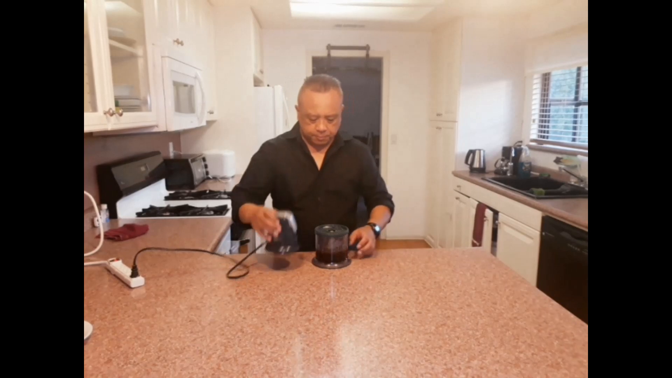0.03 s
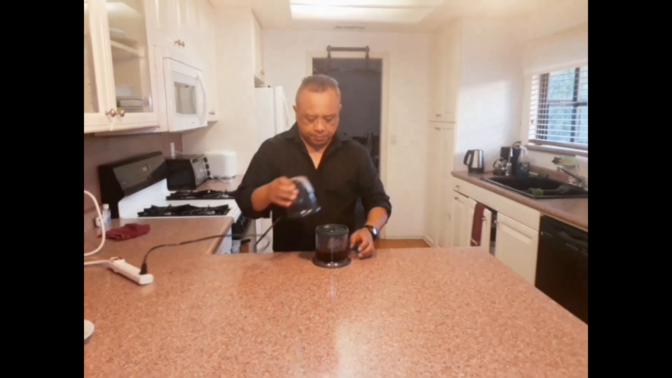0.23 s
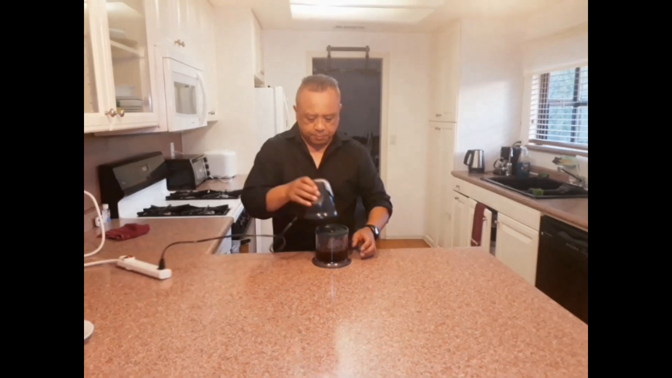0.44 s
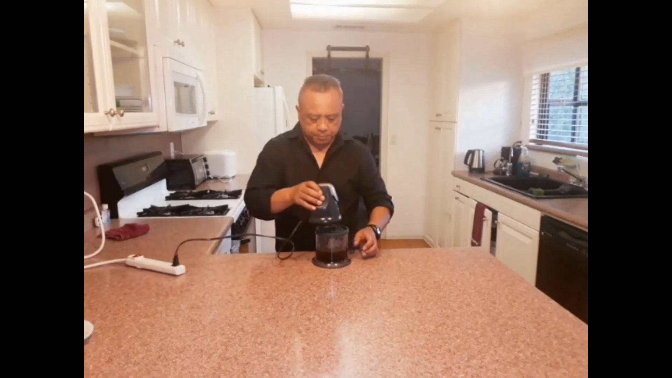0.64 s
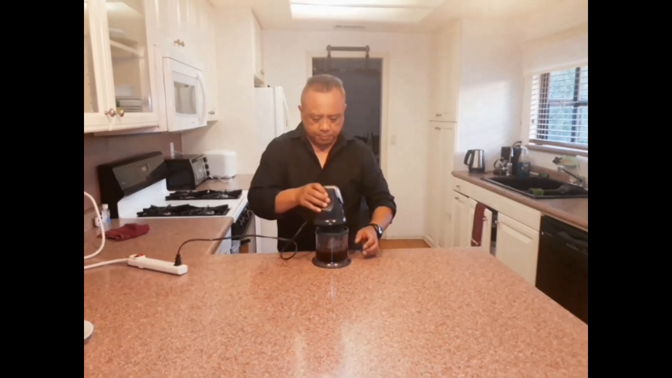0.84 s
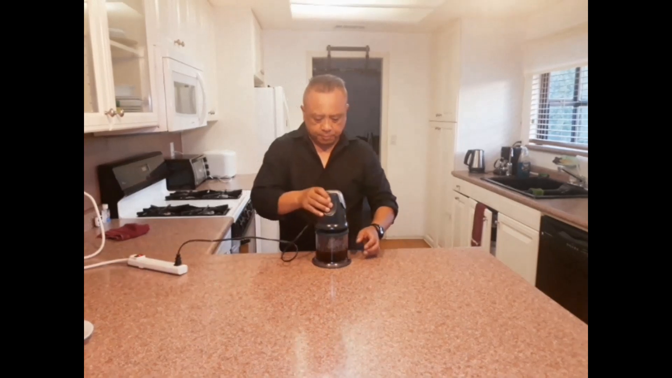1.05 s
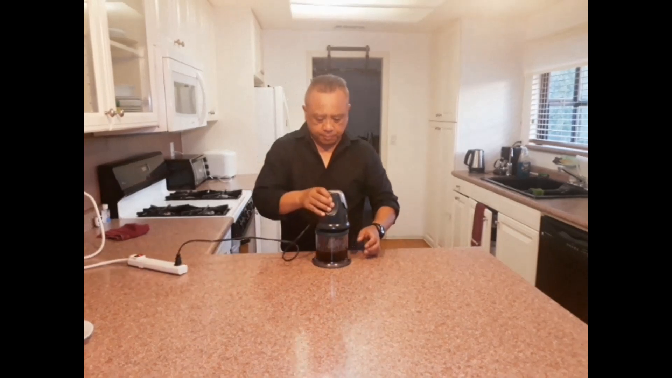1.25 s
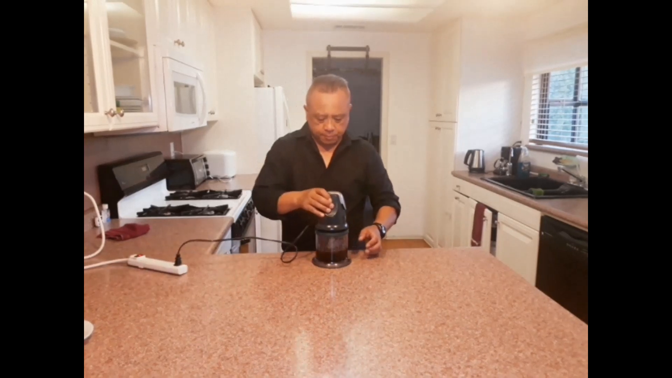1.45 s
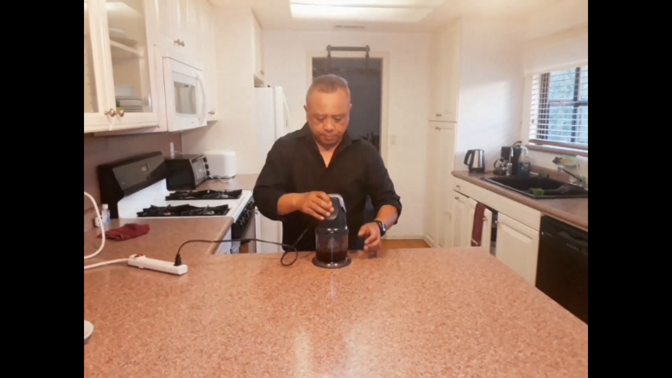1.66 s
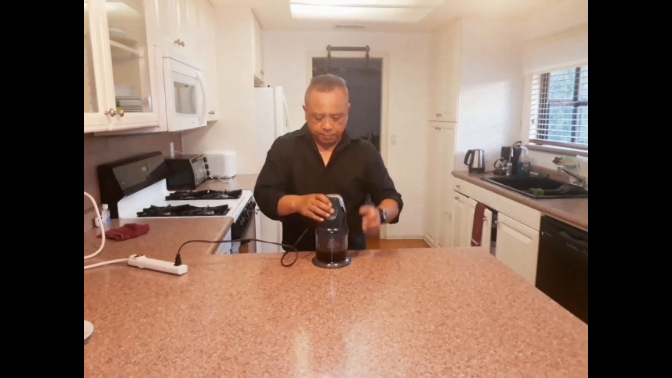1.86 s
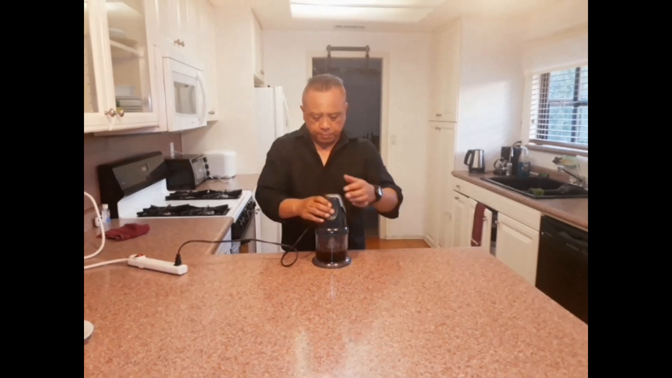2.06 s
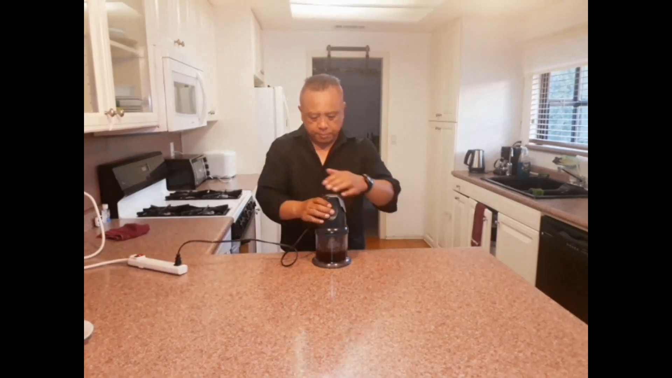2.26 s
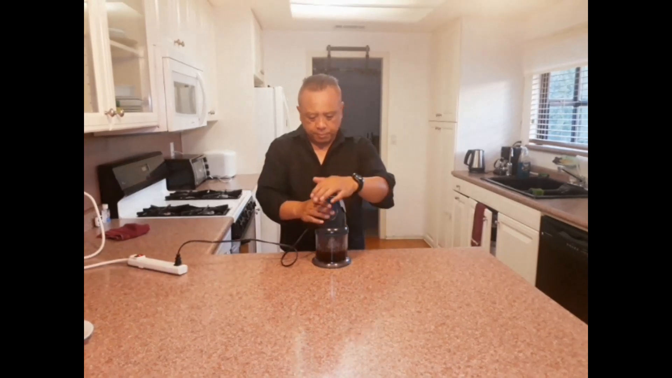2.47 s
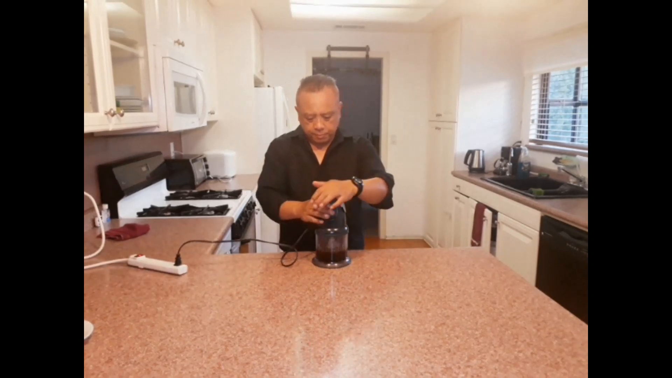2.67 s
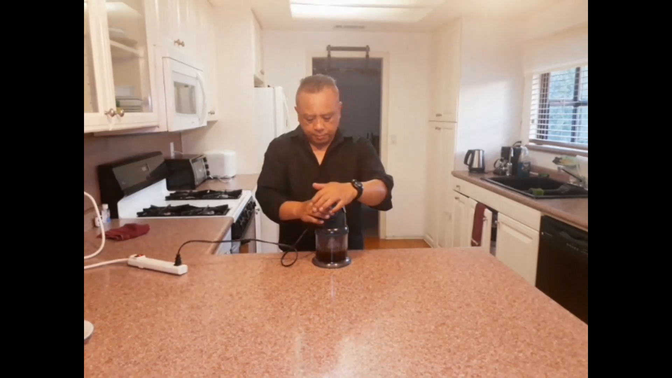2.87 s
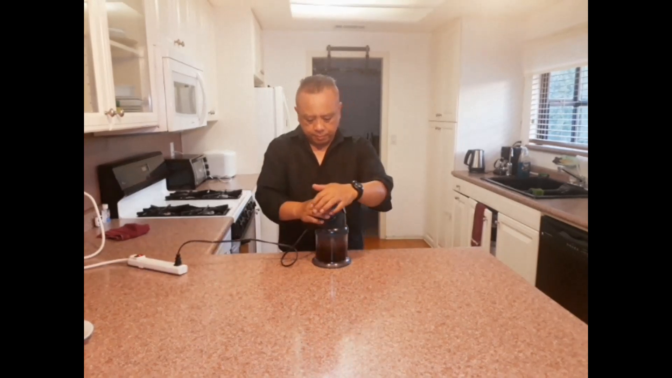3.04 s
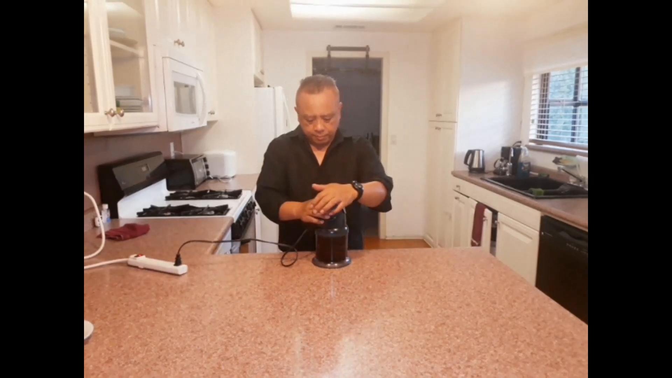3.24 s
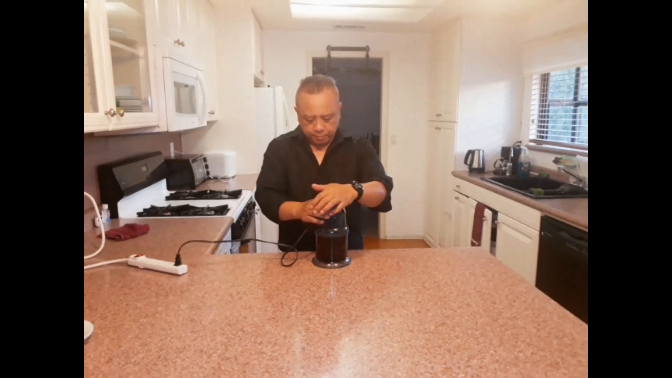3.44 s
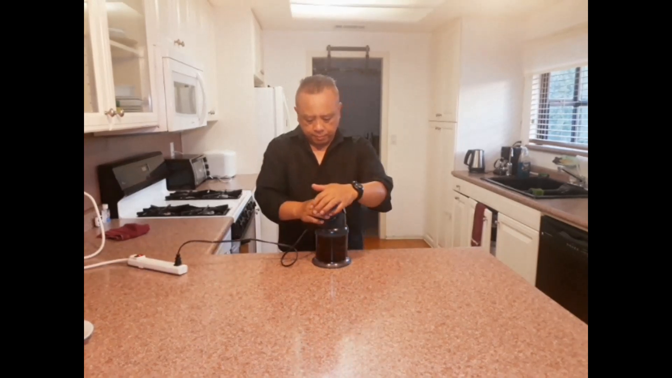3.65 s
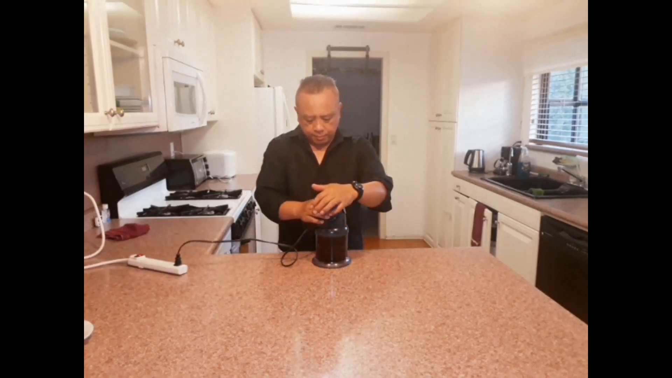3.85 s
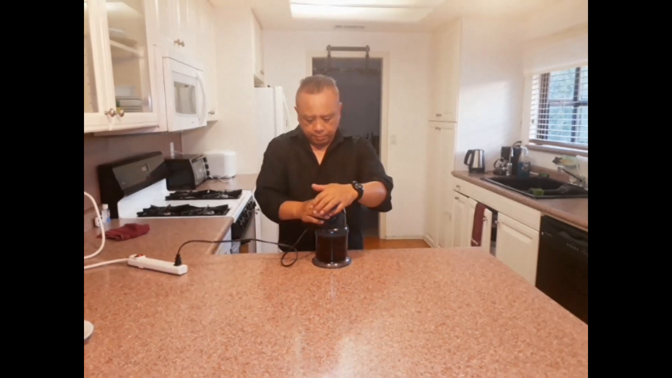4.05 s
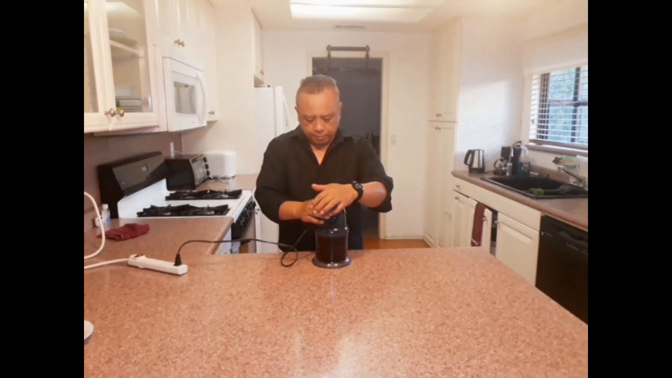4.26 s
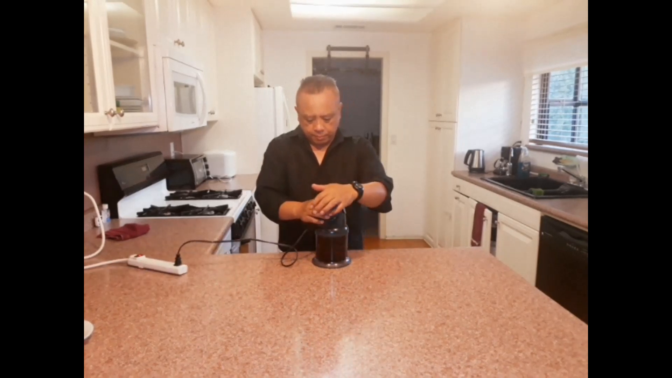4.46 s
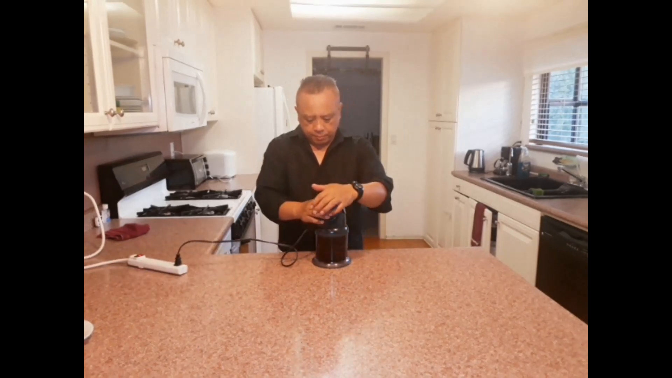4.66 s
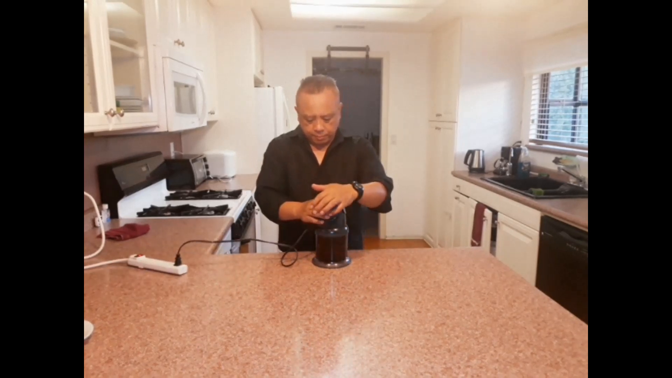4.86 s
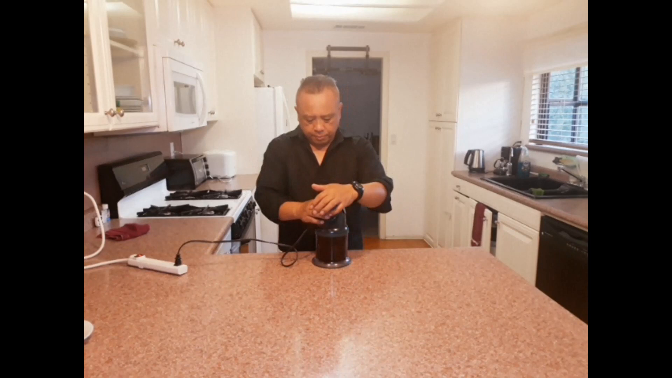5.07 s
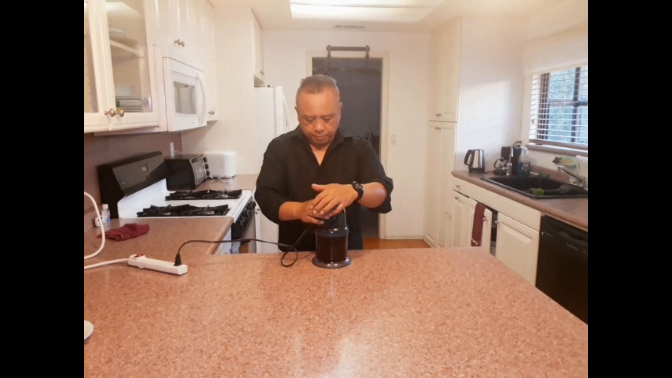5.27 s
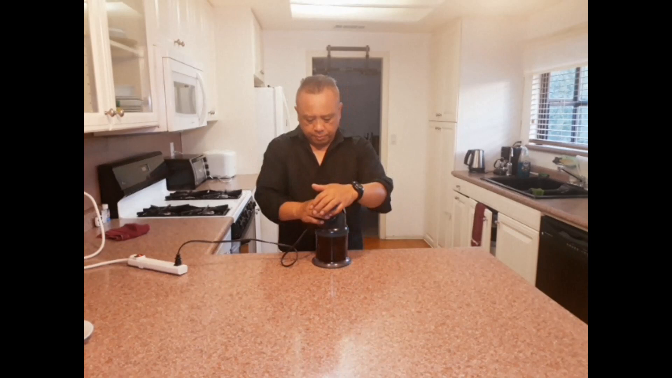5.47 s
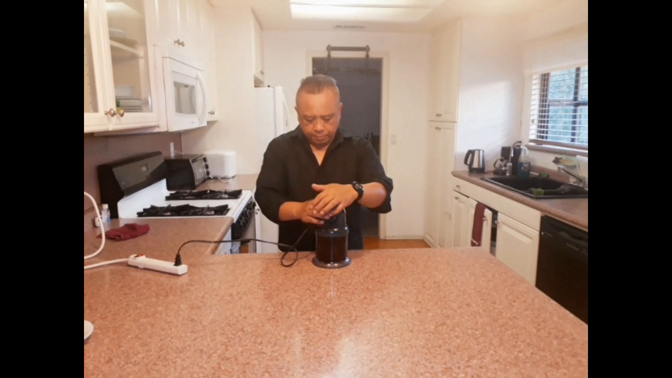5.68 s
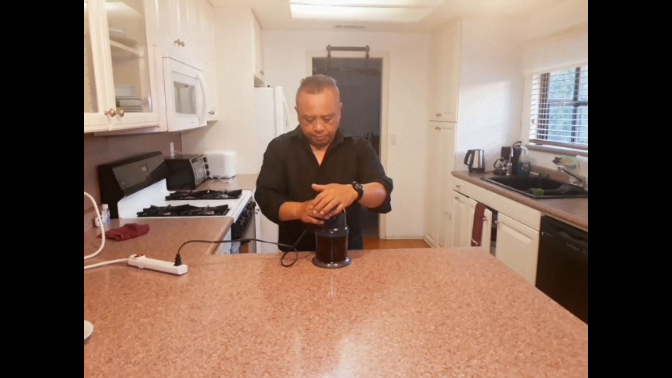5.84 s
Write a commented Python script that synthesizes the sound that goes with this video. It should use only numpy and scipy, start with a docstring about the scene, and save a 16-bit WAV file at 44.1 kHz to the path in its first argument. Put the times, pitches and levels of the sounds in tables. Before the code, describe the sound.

In a hard, lively kitchen, a cord faintly drags a plastic power strip over the counter. A motor head lands on a jar with a dull double thump, then snaps home in sharp clacks. After a quiet pause with tiny clicks, the chopper spins up fast into a loud, rattling whine with churning food, easing a little once the food becomes puree. Stereo microphone at room distance, handling slightly left.

```python
"""Electric chopper on a kitchen counter

A hard kitchen, heard in stereo with the handling a little left of centre, over a faint room background.
A cord drags a power strip over the worktop (slipping, gritty noise and a ringing case); the motor head is
set on the jar and snaps home (thuds, knocks, clacks, clicks). Then the motor spins up and drives the blade
through a reduction gear: teeth whine and rattle as noise and tones locked to the shaft, the unbalanced
rotor hums, and food churns as coloured noise until it turns to puree."""
import sys
import numpy as np
from scipy import signal
from scipy.fft import rfft, irfft, next_fast_len
from scipy.io import wavfile
from scipy.ndimage import map_coordinates

SR = 44100
rng = np.random.default_rng(int(sys.argv[2]) if len(sys.argv) > 2 else 0)


def dump_mix(stems):
    """Bounce the given channels to the path in sys.argv[1] as a 16-bit WAV at rate SR."""
    frames = np.atleast_2d(stems).T  # one column per channel
    limited = np.clip(frames, -1, 1)  # hard clip at full scale
    pcm = np.round(limited * 32767).astype(np.int16)
    wavfile.write(sys.argv[1], SR, pcm)


N = 260631
TIME = np.arange(N) / SR  # seconds


def amp(db):
    """Decibels to gain."""
    return 10 ** (np.asarray(db) / 20)


def unit(x):
    """Scale to rms 1."""
    return x / np.sqrt(np.mean(x ** 2) + 1e-20)


def along(points, hz):
    """Read a curve of (Hz, value) points on a log frequency axis."""
    f, v = np.transpose(points)
    return np.interp(np.log(hz + 1), np.log(f + 1), v)


def wobble(rate, clock=TIME):
    """A smooth random curve with this many knots per second of the clock."""
    knots = rng.standard_normal(int(N * rate / SR) + 4)
    return map_coordinates(knots, [clock * rate])


def filtered(x, response):
    """Multiply the spectrum of x by a response of frequency."""
    m = next_fast_len(N + SR // 2)
    return irfft(rfft(x, m) * response(np.fft.rfftfreq(m, 1 / SR)), m)[..., :N]


def colour(points):
    """The response of a (Hz, dB) spectrum, falling away below its first point."""
    return lambda hz: amp(along(points, hz)) * np.minimum(hz / points[0][0], 1) ** 2


def resonances(modes):
    """The response of damped modes (Hz, width Hz, dB), neighbours in opposite phase."""
    def response(f):
        total = 0
        for k, (centre, width, db) in enumerate(modes):
            band = 1j * f * width
            total = total + (-1) ** k * amp(db) * band / (centre * centre - f * f + band)
        return total
    return response


# How alike a source reaches left and right. Each row: frequency in Hz, left-right correlation (-1 to 1).
ALIKE = [(60, -0.086), (110, 0.669), (200, 1), (380, 0.6529), (700, 0.357), (1290, -0.0478), (2380, 0.653),
         (4400, -0.1024), (8120, -0.1692), (15000, -0.1004)]


def noise(response, alike=ALIKE):
    """Coloured stereo noise; sharing power between centre and side sets its likeness, and the centre has rms 1."""
    def mid_side(hz):
        turn = np.arccos(np.clip(along(alike, hz), -1, 1)) / 2
        return response(hz) * [np.cos(turn), np.sin(turn)]
    mid, side = filtered(rng.standard_normal((2, N)), mid_side)
    return np.array([mid + side, mid - side]) / np.std(mid)


# How long the hard kitchen rings on. Each row: frequency in Hz, time to fall by 60 dB in seconds.
KITCHEN = [(150, 0.4596), (400, 0.4239), (1000, 0.3995), (3000, 0.49685), (7000, 0.4747), (14000, 0.23254)]


def kitchen(x, wet_db):
    """Direct sound plus a stereo tail in which each frequency dies at its own speed."""
    hz, t, z = signal.stft(rng.standard_normal((2, SR // 2)), SR, nperseg=256)
    fading = z * amp(-60 * t / along(KITCHEN, hz)[:, None])
    mid, side = signal.istft(fading, SR, nperseg=256)[1]
    # long waves reach both ears alike
    side = signal.sosfilt(signal.butter(2, 600, "high", fs=SR, output="sos"), side)
    tail = np.array([mid + side, mid - side]) / np.linalg.norm(mid)
    wet = signal.fftconvolve(np.atleast_2d(x), tail, axes=1)[:, :N]
    return (x + amp(wet_db) * wet) / np.hypot(1, amp(wet_db))


# Room background. Each row: frequency in Hz, relative level in dB per Hz.
AIR = [(25, -27.5), (80, -19.5), (120, -7.5), (175, -2.5), (210, -9), (250, 1.5), (300, -8.5), (350, 2),
       (440, -9), (520, -8), (750, -14.5), (1500, -22), (2300, -31.5), (4000, -33), (7400, -31),
       (8300, -46.5), (15800, -37)]
# Spread of the background. Each row: frequency in Hz, left-right correlation (-1 to 1).
AIR_ALIKE = [(60, 0.7834), (180, 0.9538), (550, 0.5678), (1650, -0.2285), (4970, 0.0234), (15000, -0.319)]


def room_air():
    """The steady background of the room: faint coloured noise, a touch stronger on the left."""
    return amp(-53) * noise(colour(AIR), AIR_ALIKE) * amp([[.7], [-.7]])


# Plastic edge snapping, shared by grit and rim. Each row: frequency in Hz, relative level in dB per Hz.
CLACK = [(400, -18.5), (1000, 6.5), (1350, 3.5), (1800, 1), (2250, 2.5), (2800, -8), (3400, 5), (4400, 3),
         (6500, -9), (9000, -30), (12000, -15.5), (15500, -13.5)]
# Strip sliding on the worktop. Each row: frequency in Hz, relative level in dB per Hz.
SCRAPE = [(200, -5.5), (380, 15.5), (500, -3.5), (700, 12), (1100, -4.5), (1900, 0), (2700, -5.5),
          (4500, -3), (7000, -7.5), (10000, -15.5), (12500, -12), (15500, -5.5)]
# Hollow case of the strip. Each row: resonance in Hz, width in Hz, relative level in dB.
STRIP = [(2405.9, 77.6, 2.5), (3017, 87, -6), (3608, 153.2, -11), (4814, 156.3, -11)]
# Tugs of the cord. Each row: start in seconds, end in seconds, level in dB, extra level of the case in dB.
TUGS = [(0.022, 0.1, -66, 0), (.225, 0.312, -55.5, -14), (.335, .44, -53, -0.5), (.43, .515, -56.5, 3)]
TUG_RISE_S, TUG_T60 = 0.08051, 0.7299  # s: the strip picks up speed, then slides to rest
CASE_T60 = 0.16  # s: extra fade that quiets the hollow case soon after each tug
GRIT_PER_S, GRIT_SPREAD_DB = 280, 6.5  # catches on specks of the worktop


def power_strip(scrape_db, grit_db, case_db):
    """Plastic slides over the worktop in uneven slips and catches on grit; some tugs ring its hollow case."""
    sliding, case_gain = np.zeros((2, N))
    for start, end, db, ring_db in TUGS:
        after = np.maximum(TIME - end, 0)
        pickup = np.clip((np.minimum(TIME, end) - start) / TUG_RISE_S, 0, 1)
        tug = amp(db - 60 * after / TUG_T60) * pickup
        sliding += tug
        case_gain += amp(case_db + ring_db - 60 * after / CASE_T60) * tug
    unevenness_db = 1.46 * wobble(300) + 0.928 * wobble(39.38)
    slips = amp(scrape_db + unevenness_db) * noise(colour(SCRAPE))
    catch_gains = amp(GRIT_SPREAD_DB * np.clip(rng.standard_normal(N), -2, 2))
    catches = (rng.random(N) < GRIT_PER_S / SR) * catch_gains
    grit = amp(grit_db) * unit(filtered(catches, colour(CLACK)))
    case = case_gain * noise(resonances(STRIP))
    return kitchen(sliding * (slips + grit) + case, wet_db=-3.5)


def burst(envelope, spectrum):
    """Noise under an envelope, coloured afterwards so that a dull blow also starts softly."""
    response = colour(spectrum)
    scale = np.sqrt(np.mean(response(np.fft.rfftfreq(N, 1 / SR)) ** 2))
    return filtered(envelope * rng.standard_normal(N), response) / scale


# What a contact excites: (hardness that excites it most, dB).
THUD_LAW, KNOCK_LAW, CLACK_LAW = (0.1892, 0), (0.40962, 0), (0.7063, 1.445)
SELECTIVITY_DB = 116  # loss per squared step of hardness away from that best value


def excited(law, hardness):
    """Gain with which a contact of this hardness sets off one kind of sound."""
    best, db = law
    return amp(db - SELECTIVITY_DB * (hardness - best) ** 2)


# Blunt contacts of strip, head, jar, fingers and switch. Each row: start in seconds, level in dB, hardness 0-1.
CONTACTS = [(.293, -48, 0.35), (1.116, -34.5, 0.11), (1.134, -40, 0.17), (1.176, -39, 0.16),
            (1.437, -33.5, 0.24), (1.463, -22, 0.14), (1.473, -19.5, 0.17), (1.647, -30, 0.6),
            (1.666, -29, 0.47), (1.702, -24.5, 0.43), (1.733, -33.5, 0.47), (2.999, -32, 0.4)]
# Jar rocking on the counter. Each row: frequency in Hz, relative level in dB, time to fall by 60 dB in seconds.
THUD = [(78.31, -19, 0.2744), (101.28, -38.5, 0.2), (212.55, -11.5, 0.1653), (322.67, 0.5, 0.1828),
        (458.58, -27, 0.304), (500.54, -33.5, 0.252)]
# Knock on the jar wall. Each row: frequency in Hz, relative level in dB per Hz.
KNOCK = [(40, -6), (90, -3.5), (160, 5), (340, 3), (480, -1), (750, -8.5), (1200, -18.5), (2400, -28.5),
         (3200, -44), (6000, -64.5)]


def contacts(knock_t60, clack_t60):
    """Soft contacts rock the jar and knock its wall; harder ones make the plastic rim clack."""
    thud, knock, clack = np.zeros((3, N))
    t = TIME[:SR // 2]
    ring = sum(amp(db - 60 * t / t60) * np.sin(2 * np.pi * hz * t) for hz, db, t60 in THUD)
    soft_ring = ring * (1 - np.exp(-t / 0.002141))
    clack_onset = 1 - np.exp(-t / 0.001536)
    for s, db, hardness in CONTACTS:
        start = round(s * SR)
        span = slice(start, start + len(t))
        thud[span] += excited(THUD_LAW, hardness) * amp(db) * soft_ring
        knock[span] += excited(KNOCK_LAW, hardness) * amp(db - 60 * t / knock_t60)
        clack[span] += excited(CLACK_LAW, hardness) * amp(db - 60 * t / clack_t60) * clack_onset
    return thud + kitchen(burst(knock, KNOCK) + burst(clack, CLACK), wet_db=0.5)


# Clicks of plastic edges and locking lugs, each at its own pitch. Each row: start in seconds, level in dB,
# resonance in Hz, width in Hz, time for the exciting crack to fall by 60 dB in seconds.
CLICKS = [(.067, -58.5, 7263, 600, 0.01878), (.505, -43.5, 2473, 900, 0.01256),
          (1.116, -39.5, 691.5, 447.1, 0.01675), (1.474, -38, 1400, 1500, .028),
          (1.648, -36, 1382, 800, .035), (1.651, -38.5, 5973, 2200, 0.03612),
          (1.664, -33.5, 1600, 2500, .014), (1.667, -46, 14010, 4000, .03),
          (1.702, -33.5, 2201, 3313, 0.01637), (1.7325, -32, 2300, 1700, 0.01501),
          (2.626, -55.5, 7248, 900, 0.0168), (2.808, -50, 2600, 2600, .03),
          (2.912, -59.5, 6787, 1500, 0.01466)]


def clicks():
    """Each click is a sudden crack that rings one damped resonance of the plastic."""
    out, t = np.zeros(N), TIME[:SR // 10]
    for s, db, hz, width, t60 in CLICKS:
        envelope = amp(db - 60 * t / t60)
        b, a = signal.iirpeak(hz, hz / width, fs=SR)
        crack = envelope * rng.standard_normal(len(t))
        for _ in range(2):  # twice through the resonance
            crack = signal.lfilter(b, a, crack)
        out[round(s * SR):][:len(t)] += unit(crack) * np.sqrt(np.mean(envelope ** 2))
    return kitchen(out, wet_db=-1.5)


ON_S = 2.996  # the motor is switched on


def since_on():
    """Seconds that the motor has been running."""
    return np.maximum(TIME - ON_S, 0)


def rise(rise_s):
    """Gain that climbs from 0 to 1 after the switch closes."""
    return 1 - np.exp(-since_on() / rise_s)


def step(at_s, spread_s):
    """A soft step from 0 to 1."""
    return .5 + .5 * np.tanh((TIME - at_s) / (2 * spread_s))


GEAR_RATIO = 6  # motor turns per blade turn
TOP_SPEED_HZ = 350  # turns per second that the motor would reach in the end
# Speed still missing, from inertia and from thick food. Each row: turns per second, time constant in seconds.
SPIN_UP = [(192, .197), (36, 2.3)]
# The blade slips through a gap in the food, then snags.
# Each row: centre in seconds, half length in seconds, change of speed in turns per second.
SURGES = [(3.123, 0.04008, 5), (3.276, .05, 6), (3.445, .055, -6)]


def motor_speed():
    """Turns per second: a quick spin-up, then a slow climb as the food gives way."""
    surges = sum(hz * np.exp(-((TIME - s) / half_s) ** 2) for s, half_s, hz in SURGES)
    missing = sum(hz * np.exp(-since_on() / s) for hz, s in SPIN_UP)
    return TOP_SPEED_HZ + surges - missing


PUREE_S, PUREE_SPREAD_S = 5.0644, 0.11626  # when the food turns to puree, and how gradually
# Chunks caught by the blade swell rattle, fizz, churn and lumps.
# Each row: centre in seconds, half length in seconds, swell in dB.
CHUNKS = [(4.632, 0.0594, 1.15), (5.03, 0.0292, 3), (5.399, 0.08304, 1), (5.63, 0.0682, 3),
          (5.753, 0.0291, 2.5)]


def loudness(law, speed):
    """Gain of one noise: it grows with speed, swells on chunks and falls once the food is puree."""
    db, puree_db, power, rise_s = law
    chunk_db = sum(swell_db * np.exp(-((TIME - s) / half_s) ** 2) for s, half_s, swell_db in CHUNKS)
    level_db = db + chunk_db + puree_db * step(PUREE_S, PUREE_SPREAD_S)
    return rise(rise_s) ** 2 * (speed / TOP_SPEED_HZ) ** power * amp(level_db)


# Rocking modes of the jar that the rotor sweeps through.
# Each row: turns per second in Hz, half width in Hz, relative level in dB.
ROCKING = [(288.93, 11.01, -27), (308.42, 1.006, -26), (323.25, 6.138, -18), (330.81, 1.877, -35)]
# Tones of the blade shaft. Each row: multiple of its rate, level in thick food in dB, in thin puree in dB.
BLADE = [(2, -62.5, -83.5), (4, -44.5, -52), (5, -53, -31.5), (7, -43, -43.5), (8, -44.5, -53),
         (9, -44, -57), (10, -42.5, -73.5), (12, -41.5, -52)]
BALANCED_S, BALANCED_SPREAD_S, BALANCED_DB = 4.614, 0.3012, -6  # the load evens out, the rotor shakes less
BLADE_FREE_S, BLADE_FREE_SPREAD_S = 4.898, 0.5089  # the blade comes to run freely


def shaft_tones(speed, angle, waver_db, hum_waver_db):
    """The rotor hums once a turn, loudest where it rocks the jar; blade multiples change as the food thins."""
    rocking = sum(amp(db) / (1 + ((speed - hz) / width) ** 2) for hz, width, db in ROCKING)
    hum_db = BALANCED_DB * step(BALANCED_S, BALANCED_SPREAD_S) + hum_waver_db * wobble(9.7)
    rotor = rocking * amp(hum_db) * np.sin(angle)
    thin = step(BLADE_FREE_S, BLADE_FREE_SPREAD_S)
    blade = np.zeros(N)
    for order, thick_db, thin_db in BLADE:
        level_db = thick_db + thin * (thin_db - thick_db) + waver_db * wobble(16)
        blade += amp(level_db) * np.sin(order * angle / GEAR_RATIO + 0.4798 * wobble(14))
    return np.sqrt(2) * (rise(0.0103) * rotor + rise(0.1535) ** 2 * blade)


# Bands of the gear's whine, lowest first. Each row: level in dB, extra under starting torque in dB,
# change in puree in dB, rise time in seconds.
WHINE = [(-37, 10.5, -4, 0.03265), (-37, 7.5, -4.5, 0.06643), (-42.5, 2, -10, 0.0704),
         (-47.5, 2.5, -11, 0.12)]
# How well the gear case passes the whine. Each row: frequency in Hz, gain in dB.
GEAR_CASE = [(1900, 1), (2400, 4), (2650, -6), (2950, 6), (3300, -3), (3800, 2.5), (4200, -3.5),
             (4600, 2.5), (5200, -9.5), (5800, 3.5), (6600, 3), (7500, 7), (8400, -1.5), (9300, -4.5),
             (11200, 1), (12500, 0.5), (15000, 3.5)]
# Thin lines inside the first band, each a multiple of the motor speed.
CLEAN_ORDERS = [13, 13.5, 14]
MESH_ORDER = 13.5  # the bands lie at multiples of this many times the motor speed
TORQUE_S = 0.2206  # the starting torque dies away; it presses the gear teeth together
ENGAGE_S, ENGAGE_SPREAD_S = 3.033, 0.008  # the gears take up their play and begin to whine


def gear_whine(speed, angle, slack_hz, core_share, waver_db, lines_db, lines_puree_db, lines_waver_db):
    """Loose teeth blur each band; tooth errors that return each blade turn add sidebands, beside thin lines."""
    whine, lines = np.zeros((2, N))
    place = (angle / GEAR_RATIO / (2 * np.pi)) % 1  # position within one blade turn
    clock = angle / (2 * np.pi * TOP_SPEED_HZ)  # runs with the motor: slow gears blur less
    torque = np.exp(-since_on() / TORQUE_S)
    puree = step(PUREE_S, PUREE_SPREAD_S)
    engaged = step(ENGAGE_S, ENGAGE_SPREAD_S)

    for k, (db, torque_db, puree_db, rise_s) in enumerate(WHINE, 1):
        order = k * MESH_ORDER
        quadratures = []
        for errors in .35 * rng.standard_normal((2, 16)):
            pattern = map_coordinates(errors, [place * len(errors)], mode="grid-wrap")
            core = wobble(slack_hz * np.sqrt(k), clock)
            blur = core_share * wobble(110 * k, clock)
            quadratures.append(core + pattern + blur)
        a, b = quadratures
        level_db = db + torque_db * torque + puree_db * puree
        level_db = level_db + along(GEAR_CASE, order * speed) + waver_db * wobble(28)
        band = unit(a * np.cos(order * angle) + b * np.sin(order * angle))
        whine += engaged * rise(rise_s) ** 2 * amp(level_db) * band

    for order in CLEAN_ORDERS:
        level_db = lines_db + lines_puree_db * puree + lines_waver_db * wobble(11)
        lines += amp(level_db) * np.sin(order * angle + 0.3574 * wobble(20))
    return whine + rise(0.3496) * lines


# Plastic housing. Each row: frequency in Hz, relative level in dB per Hz.
HOUSING = [(200, -40.5), (550, -4), (950, -0.5), (1200, -1), (1600, 0), (1950, 0), (2400, -0.5),
           (2800, -5.5), (3700, -5.5), (4800, -6.5), (7000, -7), (9000, -26), (16000, -44)]
# Ringing of the housing. Each row: resonance in Hz, width in Hz, relative level in dB.
SHELL = [(931.36, 21.76, 3), (1528.5, 20, 4.5), (1902.2, 150, -4), (2411.6, 22.6, 5), (3501.5, 45.72, 6.5),
         (4259.3, 11.92, -4.5), (5523.6, 32.4, 1.5), (7448.7, 23.6, 4)]
# Fine treble fizz. Each row: frequency in Hz, relative level in dB per Hz.
FIZZ = [(1500, -17.5), (3200, -1.5), (4800, 3.5), (6200, 2), (7600, 2.5), (8400, -3.5), (9600, -7),
        (11000, -5), (13000, -4.5), (15800, -6.5)]
# Churning food. Each row: frequency in Hz, relative level in dB per Hz.
CHURN = [(60, -46.5), (130, -38.5), (190, -9), (240, -12), (290, 1), (480, -2), (560, -11), (610, -6),
         (900, -10), (1500, -27), (3000, -70.5)]
# Air and wall resonances of the jar. Each row: resonance in Hz, width in Hz, relative level in dB.
JAR = [(153.89, 15.44, 5.5), (277.79, 14.625, 7.5), (317.12, 11.613, 10.5), (363.22, 11.24, 4),
       (424.56, 18.506, 5.5), (540.97, 19.065, 5.5)]
# Food thrown against the jar wall. Each row: frequency in Hz, relative level in dB per Hz.
LUMPS = [(30, -29), (50, -20), (80, -18), (100, -20.5), (120, -10), (132, -18), (151, 3), (175, -5.5),
         (230, -14), (400, -22.5)]
# How each noise follows the machine. Columns: gain at top speed in dB, change in puree in dB,
# power of speed, rise time in seconds.
RATTLE_LAW = (-28.3, -3.5, 0.6, 0.02)
FIZZ_LAW = (-31, -6.5, 0.7, 0.032)
CHURN_LAW = (-30, -4.5, 0.45, 0.0003)
LUMPS_LAW = (-41.5, -13.5, 0.5505, 0.0169)


def chopper(churn_db, jar_db, shell_db, throb_db, grain_db):
    """Shaft tones, gear whine, churning food, and a rattle that throbs once and twice per blade turn."""
    speed = motor_speed()
    angle = 2 * np.pi * np.cumsum(speed * (1 + 0.0020132 * wobble(10))) / SR
    blade = angle / GEAR_RATIO
    throb = throb_db * (np.sin(blade) + 0.447 * np.sin(2 * blade))
    # uneven blows of teeth and food
    blows = unit(amp(throb + grain_db * wobble(900) + 0.4127 * np.sin(angle) + 1.191 * wobble(35)))
    rattle = kitchen(blows * noise(colour(HOUSING)), wet_db=-9.0)
    rattle = rattle + amp(shell_db) * noise(resonances(SHELL))
    fizz = kitchen(blows * noise(colour(FIZZ)), wet_db=-12.5)

    def in_jar(hz):
        """A small jar radiates little bass."""
        return resonances(JAR)(hz) * np.minimum(hz / 200, 1) ** 3

    churn = amp(churn_db) * noise(colour(CHURN)) + amp(jar_db) * noise(in_jar)
    lumps = amp(1.66 * wobble(11)) * noise(colour(LUMPS))
    noises = loudness(RATTLE_LAW, speed) * rattle + loudness(FIZZ_LAW, speed) * fizz
    noises += loudness(CHURN_LAW, speed) * churn + loudness(LUMPS_LAW, speed) * lumps
    teeth = gear_whine(speed, angle, slack_hz=853.57, core_share=0.6906, waver_db=1.6176,
                       lines_db=-43.5, lines_puree_db=-1.0, lines_waver_db=3.0)
    whine = kitchen(teeth, wet_db=-3)
    return noises + whine + shaft_tones(speed, angle, waver_db=1.5, hum_waver_db=0.5913)


# Lean of the machine across the stereo picture. Each row: frequency in Hz, left minus right in dB.
LEAN = [(60, -6), (99, 2), (160, 0), (270, 1), (450, 2), (740, 0), (1220, 0.5), (2010, 1.5), (3330, -2.5),
        (5500, -2), (9080, 7.5), (15000, 8)]


def scene():
    """Room air, handling a little to the left, and the chopper, whose highest treble leans left."""
    air = room_air()
    strip = power_strip(scrape_db=0.1436, grit_db=-6.5, case_db=-2.5)
    handling = strip + contacts(knock_t60=0.05168, clack_t60=0.03632) + clicks()
    machine = chopper(churn_db=-3, jar_db=-2, shell_db=-11.0, throb_db=0.6725, grain_db=0.8683)
    placed = filtered(machine, lambda hz: amp(np.outer([.5, -.5], along(LEAN, hz))))
    return air + handling * amp([[.6], [-.6]]) + placed


def record(dry):
    """The microphone channel keeps nothing above its band limit of 15900 Hz."""
    return filtered(dry, lambda hz: hz < 15900)


dry = scene()
out = record(dry)
dump_mix(out)
```